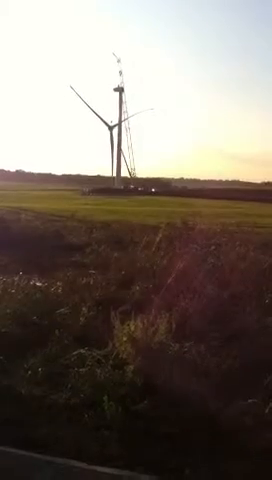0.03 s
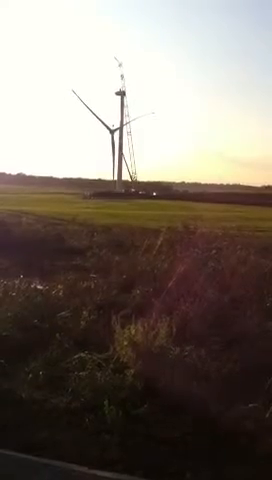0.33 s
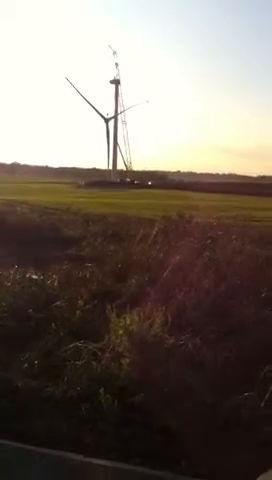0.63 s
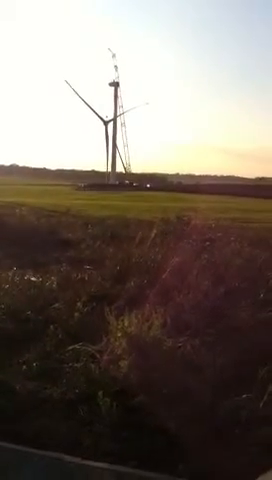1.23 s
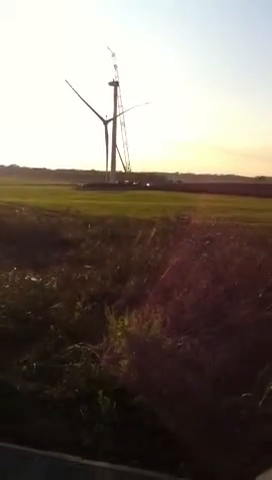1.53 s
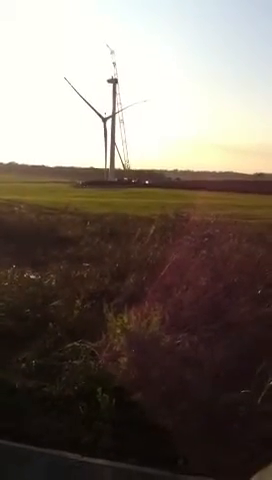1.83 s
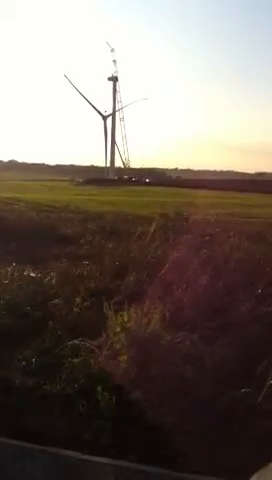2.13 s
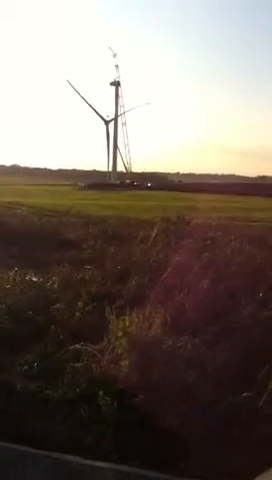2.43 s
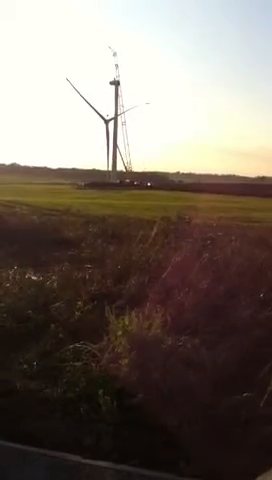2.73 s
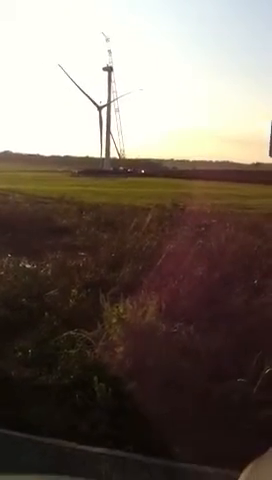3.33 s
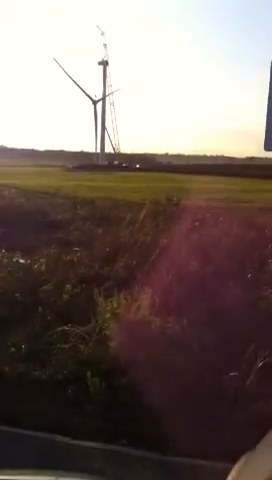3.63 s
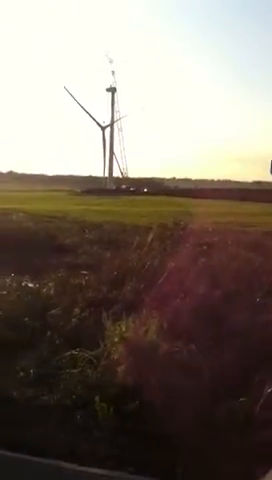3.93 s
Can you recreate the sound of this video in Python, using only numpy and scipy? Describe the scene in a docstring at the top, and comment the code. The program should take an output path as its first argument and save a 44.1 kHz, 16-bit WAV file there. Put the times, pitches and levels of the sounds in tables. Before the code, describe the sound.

Wind buffets the microphone outdoors with a low, gusty rumble and blunt thumps, one strong at about 0.4 seconds. Near 1 second it drops into a lull, leaving a faint, distant rush like tyres on a road, which slowly swells. Small puffs return from 1.6 seconds. From about 2.4 seconds the gusts grow stronger with frequent thumps, peaking around 3.2 and 3.9 seconds.

```python
"""A low, gusty rumble with blunt thumps: wind buffets a microphone at a roadside by open fields.
Eddies at the port make the rumble, brighter in each gust; single eddies hit it and thump.
Behind it a far rush, like tyres on a road, slowly swells. A faint hum shows in the lull,
and weeds swish twice, barely over the microphone's thin steady hiss."""
import sys
import numpy as np
from scipy import signal
from scipy.fft import rfft, irfft, next_fast_len
from scipy.io import wavfile
from scipy.ndimage import map_coordinates

SR = 44100
rng = np.random.default_rng(int(sys.argv[2]) if len(sys.argv) > 2 else 0)


def store_pcm(level_fs):
    """Save levels as 16-bit WAV."""
    pcm = np.round(np.clip(level_fs, -1, 1) * 32767).astype(np.int16)
    wavfile.write(sys.argv[1], SR, np.atleast_2d(pcm).T)


N = 176400

# single eddies hitting the port (time [s], relative peak [dB], pitch [Hz])
EDDY_HITS = [(0.281, -19.5, 323), (0.398, -22.5, 322), (0.416, -20.5, 350), (0.426, -9.5, 520),
             (0.441, -19.5, 382), (0.525, -19, 324), (0.532, -22.5, 300), (0.742, -25, 487),
             (0.898, -25, 278), (1.745, -22.5, 260), (2.418, -20, 390), (2.458, -20, 249),
             (2.491, -21, 260), (2.52, -13, 333), (2.546, -19.5, 288), (2.586, -26, 364), (2.682, -21, 400),
             (2.766, -22.5, 268), (2.853, -23, 268), (2.892, -21.5, 330), (2.957, -24, 280),
             (2.991, -14.5, 400), (3, -18, 377), (3.048, -22, 353), (3.12, -22, 307), (3.168, -14, 338),
             (3.228, -10.5, 325), (3.333, -20.5, 290), (3.527, -16.5, 267), (3.55, -16.5, 370),
             (3.584, -17.5, 376), (3.814, -16.5, 385), (3.883, -9, 380), (3.939, -15, 400),
             (3.947, -19.5, 340), (3.981, -16, 277)]


def amp(db):
    """Decibels to gain."""
    return 10 ** (np.asarray(db) / 20)


def unit(x):
    """Scale to rms 1."""
    return x / np.sqrt(np.mean(x ** 2) + 1e-20)


def curve(rows):
    """(time [s], value) points to one value per sample."""
    return np.interp(np.arange(N) / SR, *np.transpose(rows))


def wobble(rate_hz):
    """Smooth random curve, rate_hz knots a second."""
    return map_coordinates(rng.standard_normal(2048), [np.arange(N) * rate_hz / SR], mode="wrap")


def filtered(x, response):
    """Apply the gain response(hz) to x."""
    size = next_fast_len(N + SR // 2)
    return irfft(rfft(x, size) * response(np.fft.rfftfreq(size, 1 / SR)), size)[:N]


def noise(spectrum):
    """Noise of rms 1 coloured by (frequency [Hz], level [dB]) points."""
    knots_hz, db = np.transpose(spectrum)
    white = rng.standard_normal(N + SR // 2)
    return unit(filtered(white, lambda hz: amp(np.interp(np.log(hz + 1), np.log(knots_hz), db))))


def turbulence(spectrum, span_s):
    """Coloured noise that churns within span_s but holds its level over longer times."""
    x = noise(spectrum)
    window = signal.windows.hann(int(span_s * SR))
    power = np.abs(signal.fftconvolve(x ** 2, window / window.sum(), "same"))
    return x / np.sqrt(power + 1e-9)


def wind_strength_db():
    """Wind strength over a typical gust; the swirl around each eddy hit lifts it briefly."""
    # wind strength at the port (time [s], level [dB])
    gusts = [(0.0, -28.5), (0.17, -41), (0.19, -28), (0.29, -28.5), (0.32, -34.5), (0.43, -22.5),
             (0.47, -38.5), (0.53, -29), (0.58, -36), (0.66, -38.5), (0.68, -42), (0.72, -28), (0.79, -40),
             (0.81, -35), (0.87, -35.5), (0.89, -27), (0.92, -22.5), (0.98, -69.5), (1.27, -62),
             (1.34, -47.5), (1.59, -48), (1.61, -35.5), (1.68, -46), (1.75, -33), (1.79, -63), (1.83, -45),
             (1.85, -61), (1.93, -35.5), (1.99, -62.5), (2.12, -36), (2.16, -47), (2.21, -38.5),
             (2.23, -49), (2.44, -29.5), (2.64, -33), (2.66, -43), (2.72, -32), (2.75, -43), (2.77, -29.5),
             (2.8, -42), (2.85, -31), (2.92, -38.5), (2.95, -24), (3.14, -33.5), (3.17, -16.5),
             (3.2, -41.5), (3.23, -23.5), (3.25, -39.5), (3.34, -25), (3.39, -46), (3.52, -21), (3.6, -25),
             (3.61, -36.5), (3.73, -42), (3.83, -25), (3.87, -32), (3.89, -23.5), (3.92, -40.5),
             (3.94, -21), (4.0, -30.5)]
    typical_db = -30.5
    puff_db, puff_half_s, puff_lag_s = 4.5, 0.0061, 0.002
    t = np.arange(N) / SR - puff_lag_s
    puffs = np.max([np.exp(-((t - hit_s) / puff_half_s) ** 2) for hit_s, _, _ in EDDY_HITS], axis=0)
    return curve(gusts) - typical_db + puff_db * puffs


def buffeting():
    """One wind strength drives three eddy sizes; small eddies grow fastest, so gusts are brighter."""
    # eddy spectra by size (frequency [Hz], relative density [dB])
    large = [(20, -36), (45, -36), (70, -21), (100, -6.5), (145, 3.5), (200, 0.5), (290, -14), (400, -19),
             (1200, -71.5), (3000, -110)]
    middling = [(30, -54.5), (80, -28.5), (125, -8.5), (170, 2.5), (240, 0), (320, -6.5), (430, -18),
                (600, -34), (1200, -57), (3000, -100)]
    small = [(60, -37.5), (180, -10.5), (280, 4), (380, 3), (480, -3.5), (650, -14.5), (900, -21),
             (1400, -46), (3000, -69.5)]
    gust_db = wind_strength_db()
    sputter = wobble(rate_hz=75)
    # gain [dB] = level in a typical gust + growth with strength + roughness
    rumble = turbulence(large, span_s=0.05) * amp(-39.5 + 0.49 * gust_db + 2.0 * wobble(rate_hz=50))
    body = turbulence(middling, span_s=0.035) * amp(-35.5 + 0.77 * gust_db + 3.5 * sputter)
    flutter = turbulence(small, span_s=0.048) * amp(-43.5 + 1.124 * gust_db + 4.5 * sputter)
    return rumble + body + flutter


def thumps():
    """Each eddy is a pressure swing, shorter at higher pitch, that rings the microphone's low cut."""
    cut_hz, cut_q = 144, 0.99
    gain_db, roundness = -4, 3
    omega = 2 * np.pi * cut_hz
    low_cut = signal.bilinear([1, 0, 0], [1, omega / cut_q, omega ** 2], SR)
    out, t = np.zeros(N + SR), np.arange(SR // 20) / SR
    lead_s = t[-1] / 2
    for hit_s, peak_db, hz in EDDY_HITS:
        phase = 2 * np.pi * hz * (t - lead_s)
        push = phase * np.exp(-roundness * np.sqrt(1 + phase ** 2 / roundness))
        swing = rng.choice([-1, 1]) * signal.lfilter(*low_cut, signal.lfilter(*low_cut, push))
        start = round((hit_s - lead_s) * SR)
        out[start:start + len(t)] += amp(peak_db + gain_db) * swing / np.abs(swing).max()
    return out[:N]


def road():
    """A far rush, like tyres on a road, that slowly swells."""
    # swell of the rush (time [s], relative level [dB])
    swell = [(0.0, -60), (0.42, -62.5), (1.11, -59), (1.77, -58), (1.93, -58), (3.7, -53.5), (4.0, -52.5)]
    # rush spectrum (frequency [Hz], relative density [dB])
    spectrum = [(25, -28), (70, -13), (150, -3), (270, -1), (400, -1), (540, -3.5), (660, -1), (750, -1.5),
                (850, 3.5), (930, 0.5), (1010, -4), (1120, -2.5), (1300, -7), (1430, -5.5), (1580, -11.5),
                (2100, -18), (3000, -27), (5000, -37), (10000, -55)]
    gain_db, waver_db = 5, 0.6
    return noise(spectrum) * amp(curve(swell) + gain_db + waver_db * wobble(rate_hz=10))


def hum():
    """A faint, unsteady tone that fades in and out as its pitch sinks."""
    centre_s, half_s, level_db = 1.15, 0.1, -56.5
    pitch_hz, sag_hz_per_s, waver_hz = 265, 140, 4
    t = np.arange(N) / SR - centre_s
    hz = pitch_hz - sag_hz_per_s * t + waver_hz * wobble(rate_hz=32.1)
    tone = np.sqrt(2) * np.sin(2 * np.pi * np.cumsum(hz) / SR)
    return amp(level_db) * np.exp(-(t / half_s) ** 2) * tone


def weeds():
    """Roadside weeds swish in soft, brief bands of noise."""
    # weed swishes (time [s], pitch [Hz], level [dB], spread [octaves])
    swishes = [(1.6, 6500, -76, .7), (1.75, 2620, -71, 0.2)]
    half_s = 0.04
    out, t = np.zeros(N), np.arange(N) / SR
    for centre_s, pitch_hz, db, octaves in swishes:
        white = rng.standard_normal(N)
        band = unit(filtered(white, lambda hz: np.exp(-(np.log2((hz + 1) / pitch_hz) / octaves) ** 2)))
        out += amp(db) * np.exp(-((t - centre_s) / half_s) ** 2) * band
    return out


def hiss(level_db):
    """The microphone's own steady noise."""
    # hiss spectrum (frequency [Hz], relative density [dB])
    spectrum = [(100, 6.5), (3000, 3.5), (6000, 2), (8500, 1.5), (11000, -1), (13500, 1), (15500, 0.5)]
    return amp(level_db) * noise(spectrum)


def scene():
    """Wind on the port over the faint background, mono."""
    return (buffeting() + thumps() + road() + weeds() + hum() + hiss(level_db=-69.5))[None]


def record(dry):
    """The microphone softly flattens the hardest blows; the ends fade and the top treble is cut."""
    overload_db, fade_s, top_hz = -12, 0.004, 15800
    pressure = dry / (1 + (dry / amp(overload_db)) ** 4) ** (1 / 4)
    edge_s = np.minimum(np.arange(N), np.arange(N)[::-1]) / SR
    fade = np.minimum(edge_s / fade_s, 1)
    return np.array([filtered(x * fade, lambda hz: hz < top_hz) for x in pressure])


dry = scene()
out = record(dry)
store_pcm(out)
```